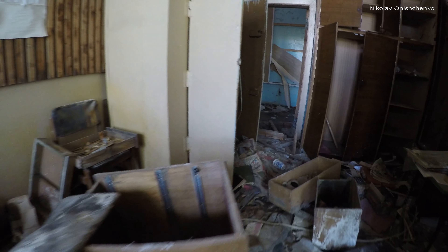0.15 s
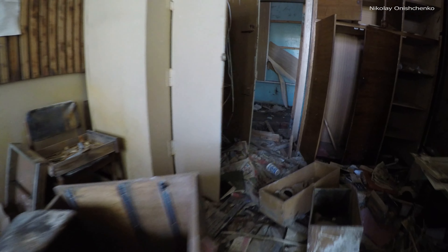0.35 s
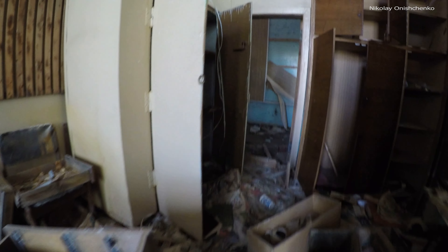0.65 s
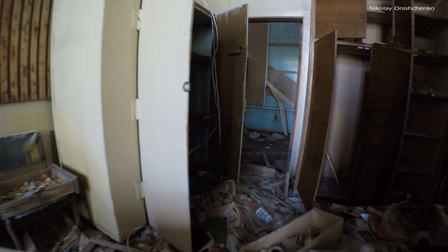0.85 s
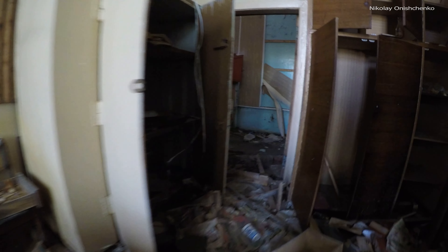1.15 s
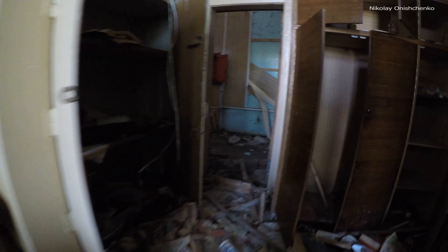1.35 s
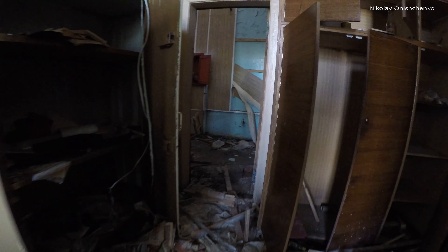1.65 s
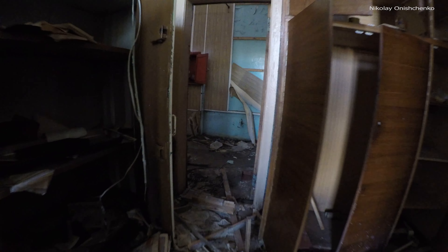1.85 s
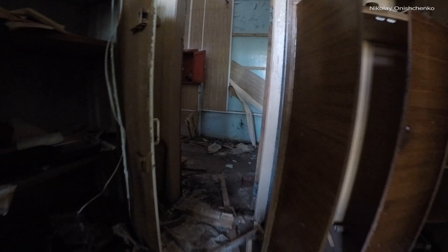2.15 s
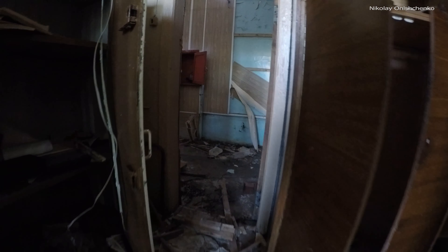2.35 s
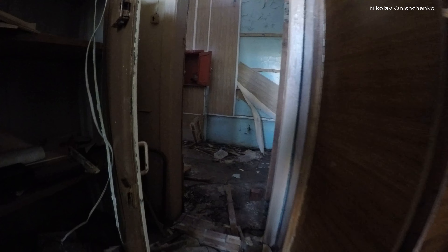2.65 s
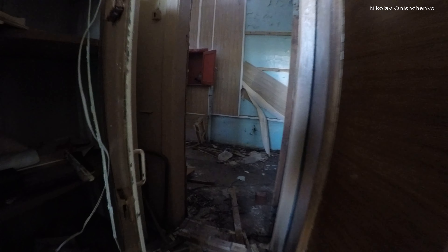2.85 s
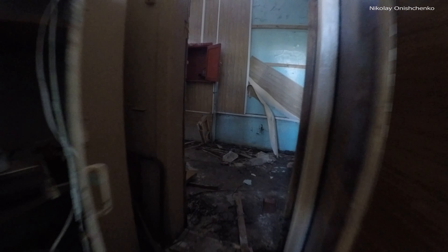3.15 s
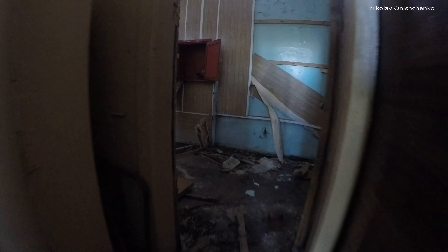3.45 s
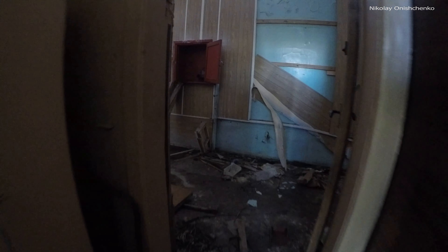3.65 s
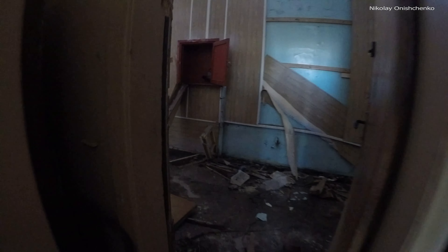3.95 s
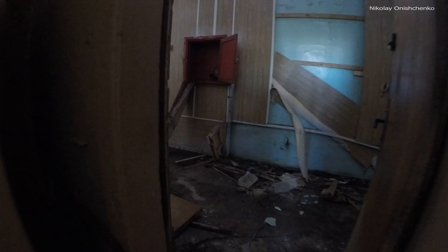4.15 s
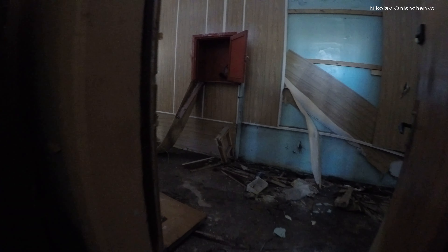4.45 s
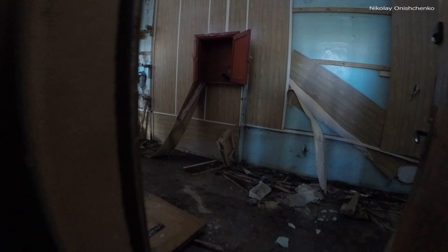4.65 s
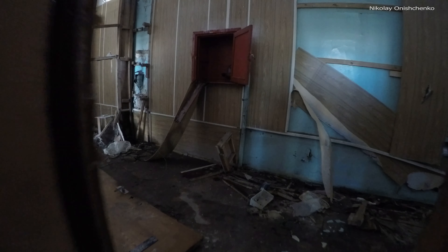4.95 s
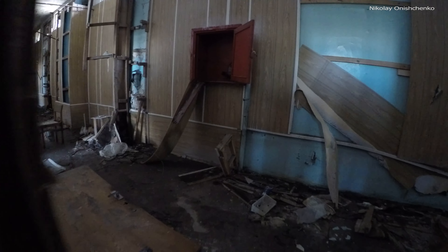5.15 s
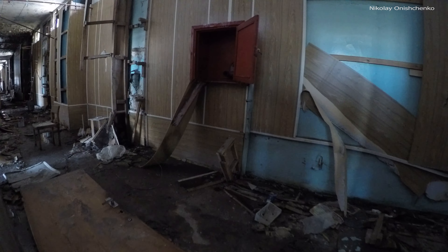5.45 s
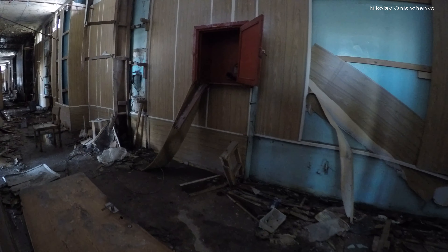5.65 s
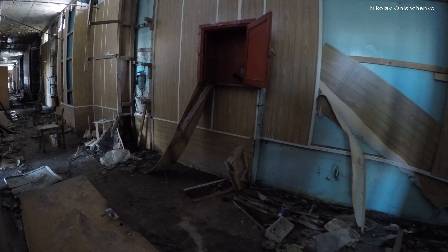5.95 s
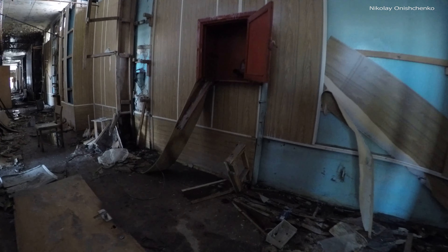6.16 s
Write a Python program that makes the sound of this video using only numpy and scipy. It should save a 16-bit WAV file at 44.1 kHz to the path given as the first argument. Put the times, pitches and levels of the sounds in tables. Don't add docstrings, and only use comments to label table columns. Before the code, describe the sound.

Indoors in a derelict building, a small enclosed microphone carried by the walker gives faint steady hiss and an unsteady, low bumping rumble. At about 0.3 s a soft gritty step ticks and thuds lightly, then quiet scuffing. At 1.1-1.2 s a firm crunch snaps shards brightly, leaving fragments rattling for under half a second. From 1.6 to 3 s only faint ticks and soft presses; a modest crunch and dull crack follow at 3.16 s. At 3.9-4.05 s a dense crunch bursts into several sharp cracks and board knocks, another knock hits at 4.23 s, and the loudest woody bang and crack lands at 4.3 s with spraying dust, ringing briefly off bare walls. Smaller cracking steps come around 5.0 s and 5.5 s, with grit settling and a sudden low rumble swell near 5.7 s. A faint last step falls at 6.2 s.

```python
import sys
import numpy as np
from scipy import signal
from scipy.fft import rfft, irfft
from scipy.io import wavfile

SR = 44100
rng = np.random.default_rng(int(sys.argv[2]) if len(sys.argv) > 2 else 0)


def boost_factor(decibels):
    exponent = np.asarray(decibels, float) / 20
    return 10 ** exponent


def transcribe(signal):
    frames = np.atleast_2d(signal).T
    limited = np.clip(frames, -1, 1)
    pcm = np.round(limited * 32767).astype(np.int16)
    wavfile.write(sys.argv[1], SR, pcm)


N = 278094

# pitch_hz, level_db
HISS_COLOUR = [(41, -32), (70, -9), (195, -15.5), (239, -17.5), (412, -26), (541, -20.5), (1610, -29),
               (5140, -31.5), (13300, -44), (14900, -46), (16000, -74.5)]
# start_s, level_db, pitch_hz
HOUSING_SWING = [(0, -50, 42.05), (1.2, -48, 41.98), (1.6, -56, 41.96), (2.8, -56, 42.02),
                 (3.3, -49.5, 41.9), (3.6, -49.5, 49.43), (4.6, -44, 47.3), (5.4, -46, 49.3),
                 (5.63, -52, 47.1), (5.67, -33, 64.2), (5.83, -35, 65.3), (5.95, -41, 68.6),
                 (6.02, -48, 55.4), (6.3, -41.5, 54)]
# start_s, level_db
BODY_JOLTS = [(0.09, -47), (0.3, -39), (0.44, -44), (1.21, -46), (1.3, -45), (1.56, -47), (2.02, -43.5),
              (2.23, -45), (2.35, -46), (2.63, -48.5), (2.74, -54.5), (2.86, -44), (3.07, -44), (3.25, -42),
              (3.39, -54), (4.12, -38), (4.32, -36.5), (4.89, -39.5), (5.0, -41), (5.11, -43), (5.37, -39),
              (5.53, -39.5), (6.07, -37)]
# pitch_hz, width_hz, level_db
HOUSING_MODES = [(1350, 660, 1), (2650, 76, -26), (4300, 1030, -8), (5160, 400, -18.5), (8900, 2900, -3)]
# pitch_hz, time_to_fall_60db_s
ROOM_RING = [(100, 0.86), (300, 0.54), (700, 0.5), (1800, 0.38), (4500, 0.4), (12000, 0.26)]
# pitch_hz, level_db
ROOM_LEVEL = [(100, -3.5), (400, -1.5), (1500, -3), (4000, -4), (12000, -0.5)]
# delay_s, level_db
WALL_ECHOES = [
    (.004, -12.5),
    (.009, -20.5),
    (.016, -8.5),
]
# pitch_hz, width_hz, level_db
FLOOR_MODES = [(156, 16, -17), (265, 62.5, 8), (596, 42, -5.5)]
# start_s, peak_db, board_pitch_hz, floor_body_relative_db
BOARD_THUDS = [(0.271, -31, 127.4, -10), (0.318, -31, 456, -8), (1.097, -30.5, 226, 2.5),
               (1.177, -22.5, 98, -14), (1.191, -29, 100, -1), (1.977, -41.5, 390, -7),
               (2.202, -34, 103, -4), (3.058, -40, 177, -6), (3.163, -35.5, 190, 4), (3.428, -52, 102, -2),
               (3.942, -29, 407, -1), (3.969, -21, 738, -14), (3.998, -15.5, 690, -4),
               (4.012, -14.5, 750, -9), (4.233, -18, 760, -9.5), (4.301, -4, 553, -5),
               (4.303, -8.5, 309, -1), (4.305, -13, 125, -8), (4.344, -25, 673, 1),
               (4.705, -42.5, 134, -13), (4.944, -36, 101, 8.5), (5.024, -25, 704, -6),
               (5.073, -36.5, 487, 1), (5.349, -23, 373, -23), (5.361, -40, 100, -3),
               (5.379, -35, 433, -12), (5.515, -21, 600, -5), (5.554, -23.5, 434, -15),
               (6.225, -38, 113, 4)]
# start_s, level_db, pitch_hz, width_hz, time_to_fall_60db_s
SHARD_RATTLES = [
    (1.176, -33, 2600, 450, 0.46),
    (1.185, -34.5, 4830, 600, 0.47),
    (4.012, -27, 1270, 900, 0.17),
    (5.075, -36, 1240, 1000, 0.13),
    (5.514, -33.5, 4300, 350, 0.3),
    (5.551, -30.5, 1350, 600, 0.17),
    (5.352, -34.5, 397, 120, 0.17),
]
# start_s, peak_db, pitch_hz, crackle_relative_db, splinter_relative_db
SHARD_SNAPS = [(1.105, -19.5, 2440, 3, -30), (1.151, -21, 1680, -4, -40), (1.174, -3.5, 3300, 2, -24),
               (1.182, -17.5, 3060, 5, -18), (1.195, -8, 2520, -16, -37), (3.164, -26, 851, 3, -29),
               (3.916, -19.5, 1300, 4.5, -17), (3.943, -8.5, 3650, 9.5, -6), (3.95, -5.5, 4150, -1, -10),
               (3.959, -7, 2800, 2, -26), (3.996, -11, 1540, 1.5, -16), (4.012, -21, 1700, 10, -6),
               (4.029, -10, 1350, -27, -27), (4.233, -6.5, 2200, -3, -27), (4.302, 2, 2740, 2, -13),
               (4.317, -4.5, 754, -21, -13.5), (4.345, -10, 1390, -25, -14),
               (5.025, -9.5, 1094, -16.5, -26), (5.073, -22.5, 1360, -2, -35), (5.514, -15, 3960, 8, -19),
               (5.534, -20, 1180, 1, -23), (5.55, -14.5, 1270, 2.5, -28), (5.562, -21.5, 1370, 1, -34),
               (5.58, -22, 1010, -1, -37)]
# start_s, peak_db, pitch_hz, crackle_relative_db
SMALL_TICKS = [(0.25, -39, 1010, 6), (0.273, -34, 3700, -9), (0.297, -32, 2570, -12),
               (0.317, -26, 1340, -2), (0.342, -36, 2140, -11), (0.453, -40.5, 3050, 7.5),
               (0.522, -35, 970, -8), (0.924, -38, 2820, 4), (0.979, -49, 990, 11), (1.001, -30, 4430, -11),
               (1.081, -36.5, 950, 11.5), (1.591, -45, 960, 0), (1.355, -31, 970, -10),
               (1.941, -41.5, 1680, -9), (1.975, -34, 1030, -6), (2.199, -33.5, 1520, -10),
               (2.318, -43, 2800, -6.5), (3.061, -30, 860, 2), (3.144, -28.5, 880, -8),
               (3.312, -40, 1210, 1), (3.328, -43.5, 790, 9.5), (3.424, -51, 1060, 11.5),
               (3.904, -37, 1530, 11), (4.148, -29.5, 1280, 4.5), (4.711, -40, 915, -6),
               (5.312, -39, 1570, 11), (5.455, -34, 2130, -3), (5.469, -31, 3430, 4),
               (5.767, -39.5, 1400, -2), (6.216, -33.5, 1090, -10)]
# peak_s, crunch_db, rise_of_30db_s, fall_of_60db_s, weight_on_boards_relative_db
SOLE_PRESSES = [(0.29, -40.5, 0.08, .5, -0.5), (0.50, -51, 0.7, .4, 2), (0.78, -53, 0.24, 1.5, -1),
                (1.018, -50.5, 0.27, 0.1, -1), (1.122, -32, .05, 0.02, 1),
                (1.184, -26.5, 0.1128, 0.2742, -3.5), (1.24, -37.5, 0.12, 1.01, -4),
                (1.61, -50, 0.1, 0.12, 3), (1.98, -51.5, 0.08, 1.14, 5), (2.21, -43, .12, 0.56, -4.5),
                (2.45, -56.5, .5, 0.6, -3.5), (3.03, -43, .06, 0.85, -3), (3.161, -39.5, 0.1, 0.2, -0.5),
                (3.32, -54.5, 0.4, 1.5, 4.5), (3.79, -57, 0.8, 8, -3), (3.964, -24, 0.0782, 0.38, -3.5),
                (4.017, -25, 0.1268, 0.04, -10), (4.58, -51, 1.5, 1.3, 0), (4.948, -33, 0.04, 0.29, -10),
                (5.03, -40, .03, 0.41, 1.5), (5.33, -49.5, 0.7, 1.5, -1.5), (5.462, -39.5, 0.08, 0.57, -13),
                (5.561, -28.5, 0.0734, 0.19, -1), (6.239, -43.5, 0.09, 0.7, -5)]
# peak_s, level_db, rise_of_30db_s, fall_of_60db_s
GRIT_SETTLING = [
    (0.0, -65, .1, 4),
    (3.926, -38, 0.0463, 0.4),
    (4.2, -49.5, 1, 2),
    (5.63, -48, 0.7, 1.22),
]
# peak_s, level_db, rise_of_30db_s, fall_of_60db_s
DUST_SKIDS = [
    (1.015, -64, 0.2, 0.1),
    (1.188, -45, 0.08, 0.33),
    (3.96, -45, 0.09, 0.1),
    (4.309, -34.5, 0, 0.2052),
    (4.946, -44, 0.03, 0.08),
]


def rms_one(x):
    return x / np.sqrt(np.mean(x ** 2) + 1e-20)


def peak_one(x):
    return x / np.abs(x).max(axis=-1, keepdims=True)


def in_time(rows):
    s, *columns = np.transpose(rows)
    return [np.interp(np.arange(N) / SR, s, column) for column in columns]


def at_hz(points, hz):
    table_hz, values = np.transpose(points)
    return np.interp(np.log(hz + 1), np.log(table_hz), values)


def swells(s, db, rise, fall):
    t = np.arange(0, N + 64, 64) / SR - np.c_[s]
    return boost_factor(np.c_[db] + np.minimum(30 * t / np.c_[rise], -60 * t / np.c_[fall]))


def every_sample(slow):
    return np.interp(np.arange(N) / 64, np.arange(len(slow)), slow)


def band(x, low_hz, high_hz):
    edges_hz = [low_hz, min(high_hz, .45 * SR)]
    return signal.sosfilt(signal.butter(2, edges_hz, "band", fs=SR, output="sos"), x)


def resonance(x, hz, width):
    r = np.exp(-np.pi * max(width, 2) / SR)
    top = np.array([1, 0, -1]) * (1 - r * r) / 2
    return signal.lfilter(top, [1, -2 * r * np.cos(2 * np.pi * hz / SR), r * r], x)


def modes(x, table, widen):
    return sum((-1) ** k * boost_factor(db) * resonance(x, hz, width * widen) for k, (hz, width, db) in enumerate(table))


def drift(rate):
    r = np.exp(-2 * np.pi * rate / SR)
    wander = signal.lfilter([1], [1, -2 * r, r * r], rng.standard_normal(N + SR))
    return rms_one(wander[SR:])


def hiss():
    colour = boost_factor(at_hz(HISS_COLOUR, np.fft.rfftfreq(N, 1 / SR)))
    return boost_factor(-60) * rms_one(irfft(rfft(rng.standard_normal(N)) * colour, N))


def rumble():
    level_db, hz = in_time(HOUSING_SWING)
    s, db = np.transpose(BODY_JOLTS)
    jolts = every_sample(swells(s, db, rise=[0.17], fall=[0.35]).sum(axis=0))
    level = np.hypot(boost_factor(level_db), jolts)
    wavering_hz = hz * (1 + 0.0476 * drift(14.4))
    swing = np.sin(2 * np.pi * np.cumsum(wavering_hz) / SR) * boost_factor(2.0 * drift(8.1))
    upper = rms_one(resonance(rng.standard_normal(N), 62.8, 22.5))
    buffet = rms_one(band(rng.standard_normal(N), 25.1, 52.0))
    moving = boost_factor(-1.25) * level * (rms_one(swing) + 0.35 * buffet + 0.22 * upper)
    steady = boost_factor(np.minimum(level_db, -46) - 7) * upper + boost_factor(-55.0) * buffet
    return moving + steady


def room(direct, sent):
    t = np.arange(SR) / SR
    tail = np.zeros((3, SR))
    edges = 70 * 2 ** np.arange(0, 8, .5)
    white = rng.standard_normal((2, 3, SR))
    for k, (low, high) in enumerate(zip(edges, edges[1:])):
        hz = np.sqrt(low * high)
        shape = boost_factor(-60 * t / at_hz(ROOM_RING, hz)) * (1 - np.exp(-t / 0.0035))
        shape = shape / np.sqrt(np.sum(shape ** 2))
        tail += band(white[k % 2], low, high) * shape * boost_factor(at_hz(ROOM_LEVEL, hz))
    echoes = sum(boost_factor(db) * np.roll(direct, round(lag * SR)) for lag, db in WALL_ECHOES)
    return echoes + signal.fftconvolve(sent, tail, axes=1)[:, :N].sum(axis=0)


def bursts(count, length, lead):
    t = np.arange(SR // 12) / SR
    click = t == 0
    spikiness = boost_factor(3.0 * rng.standard_normal((count, len(t))))
    noise = rng.standard_normal((count, len(t))) * spikiness
    return noise * np.exp(-t / length) - lead * click, np.tile(click, (count, 1)) + 1e-18


def lay(times, wet_db, direct, even):
    out = np.zeros((4, N + SR))
    past_doorway = times > 4.75
    match = np.sqrt(np.sum(direct ** 2, axis=1) / np.sum(even ** 2, axis=1))
    even = even * (boost_factor(wet_db - 2 * past_doorway) * match)[:, None]
    for k, s in enumerate(times):
        i = round(s * SR)
        out[0, i:i + direct.shape[1]] += direct[k]
        out[1 + k % 3, i:i + direct.shape[1]] += even[k]
    return out[:, :N]


def rattles():
    out, t = np.zeros(N + SR), np.arange(SR // 2) / SR
    for s, db, hz, width, t60 in SHARD_RATTLES:
        shake = rng.standard_normal(len(t)) * boost_factor(2.9 * drift(32.0)[:len(t)])
        ring = rms_one(resonance(resonance(shake, hz, width), hz, 2 * width))
        i = round(s * SR)
        out[i:i + len(t)] += boost_factor(db - 60 * t / t60) * ring
    return out[:N]


def thuds():
    s, db, hz, body_db = np.transpose(BOARD_THUDS)
    s = s + .002
    sounds = []
    for x in bursts(count=len(s), length=0.0057, lead=27.0):
        ring = np.array([resonance(resonance(row, f, 0.29 * f), f, 0.94 * f) for row, f in zip(x, hz)])
        floor = peak_one(modes(x, FLOOR_MODES, widen=2.32))
        knock = peak_one(band(band(x, 123, 620), 74, 1390))
        body = boost_factor(body_db)[:, None] * peak_one(floor + boost_factor(2) * knock)
        sounds.append(boost_factor(db - 1.5)[:, None] * (peak_one(ring) + body))
    return lay(s, -3.5, *sounds)


def shard_ring(x, hz):
    core = resonance(x, hz, 1.4 * hz) + 1.4 * resonance(x, hz, 0.23 * hz)
    return resonance(core, hz, 0.8 * hz)


def cracks():
    snaps = [(*row, -0.45) for row in SHARD_SNAPS]
    ticks = [(*row, -22, 2.7) for row in SMALL_TICKS]
    s, db, hz, broad_db, edge_db, wet_db = np.transpose(snaps + ticks)
    sounds = []
    for x in bursts(count=len(s), length=0.0042, lead=3.96):
        ring = np.array([shard_ring(row, f) for row, f in zip(x, hz)])
        broad = boost_factor(broad_db)[:, None] * peak_one(band(band(x, 410, 4150), 400, 10300))
        edge = boost_factor(edge_db + 9.0)[:, None] * peak_one(band(x, 6700, 15500))
        sounds.append(boost_factor(db - 8.5)[:, None] * (peak_one(ring) + broad + edge))
    return lay(s, wet_db, *sounds)


def grit():
    *shape, weight_db = np.transpose(SOLE_PRESSES)
    presses = swells(*shape)
    settling = swells(*np.transpose(GRIT_SETTLING)).sum(axis=0)
    skids = every_sample(swells(*np.transpose(DUST_SKIDS)).sum(axis=0))
    crunch = every_sample(np.maximum(presses.max(axis=0), settling))
    loads = (boost_factor(weight_db)[:, None] * presses).max(axis=0)
    weight = every_sample(np.maximum(loads, settling))

    born = rng.random(N) < 1800.0 * boost_factor(6.0 * drift(30)) / SR
    size = boost_factor(2.04 * np.minimum(rng.exponential(1, N), 5))
    grains = born * size * rng.choice([-1, 1], N)
    grains = grains + 0.13 * rng.standard_normal(N)

    spray = rms_one(band(grains, 6100, 12100)) * skids
    low = rms_one(band(grains, 73, 552)) * weight * boost_factor(-5.5)
    middle = rms_one(band(band(grains, 670, 5470), 575, 5700))
    dust = rms_one(band(grains, 4300, 9900)) * boost_factor(-10.5)
    return boost_factor(-4.5) * crunch * (middle + dust) + low + spray


def scene():
    direct, *sent = cracks() + thuds()
    crunch = grit()
    sent = np.array(sent) + crunch * [[1], [0], [0]]
    air = direct + crunch + rattles() + room(direct, sent)
    air = air + boost_factor(-9.5) * modes(air, HOUSING_MODES, widen=0.86)
    return np.tile(air + rumble() + hiss(), (2, 1))


def top_cut(x):
    return signal.sosfilt(signal.butter(12, 16440, fs=SR, output="sos"), x)


def record(dry):
    rounded = 1.1 * np.tanh(dry / 1.1)
    x = signal.sosfilt(signal.cheby2(10, 50, 16200, fs=SR, output="sos"), rounded)
    treble = boost_factor(-24.5) * band(np.roll(x[0], 9), 7700, 20000)
    middle = boost_factor(-38.0) * band(np.roll(x[0], 40), 930, 2400)
    mix = x + (treble + middle) * [[1], [-1]]
    return top_cut(mix)


dry = scene()
out = record(dry)
transcribe(out)
```